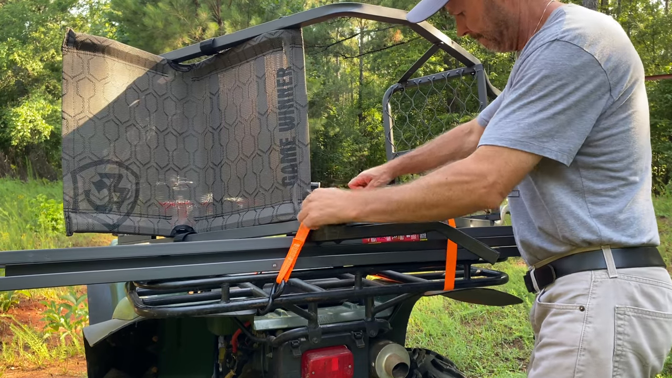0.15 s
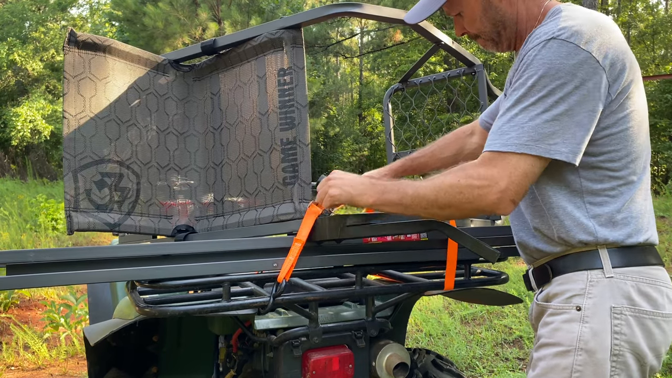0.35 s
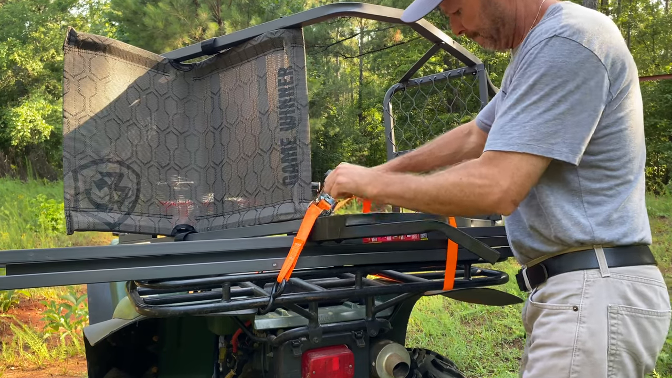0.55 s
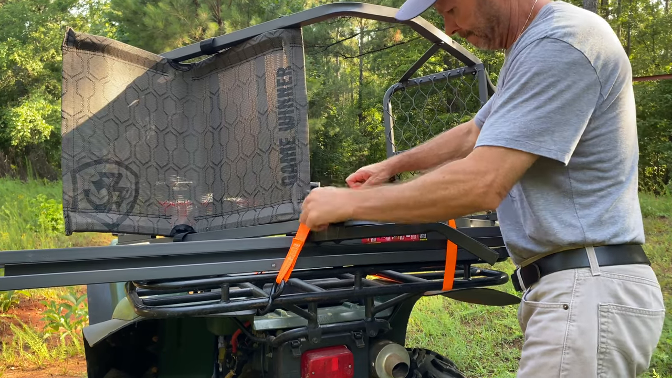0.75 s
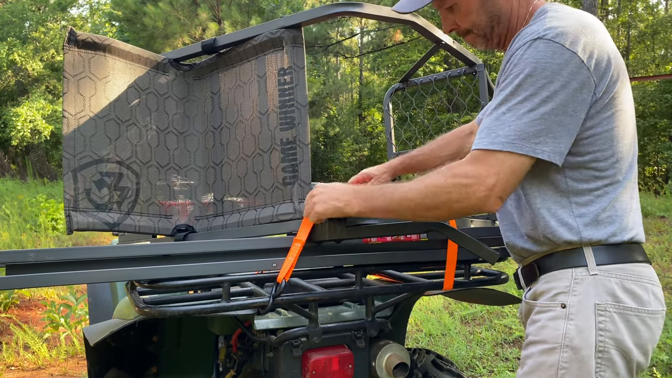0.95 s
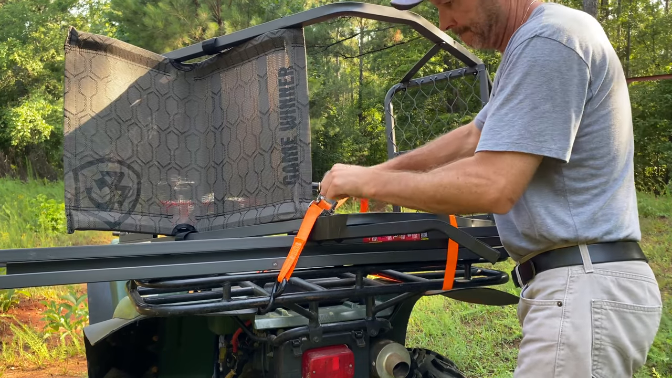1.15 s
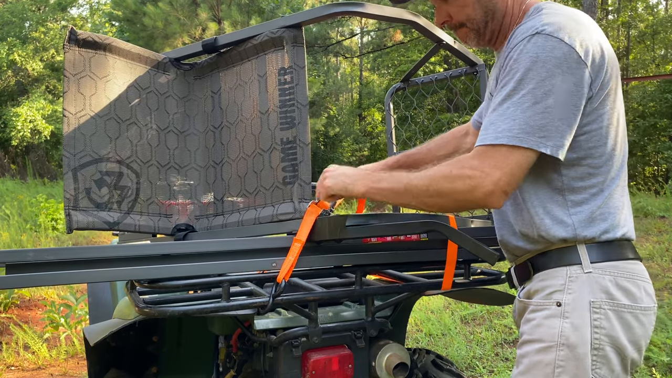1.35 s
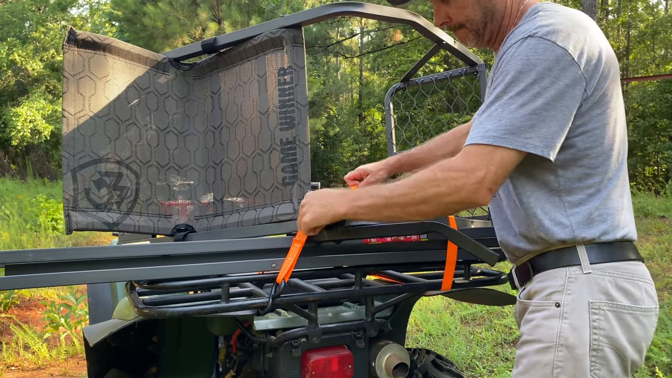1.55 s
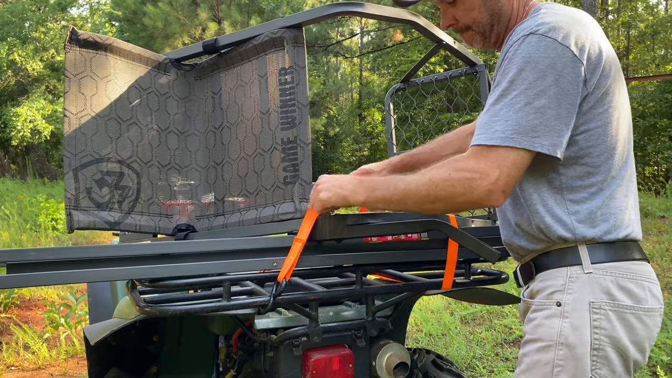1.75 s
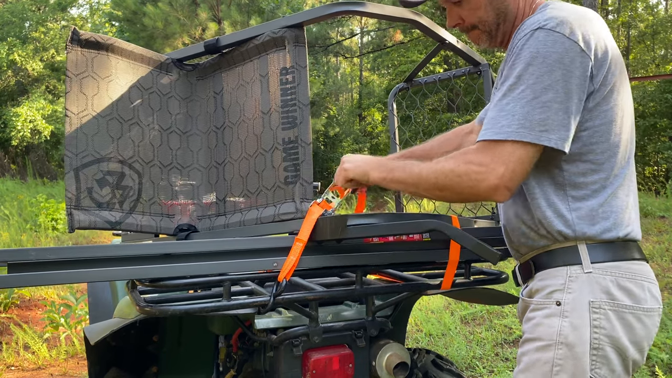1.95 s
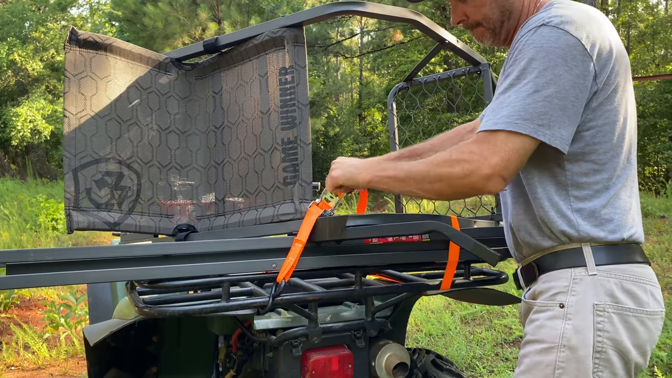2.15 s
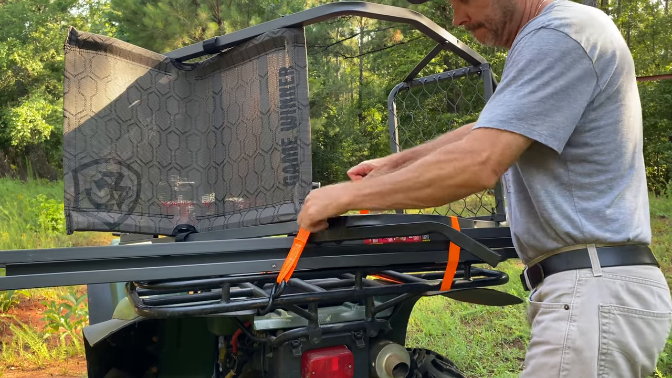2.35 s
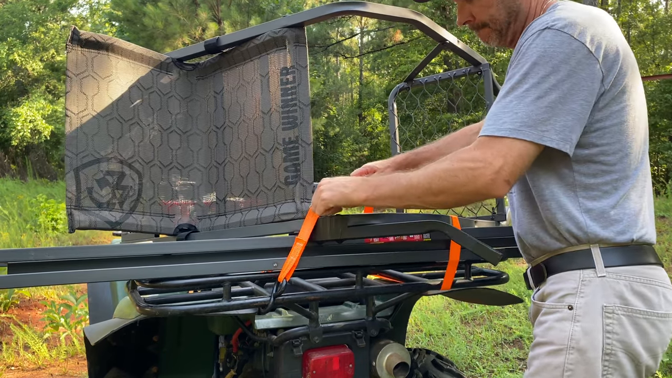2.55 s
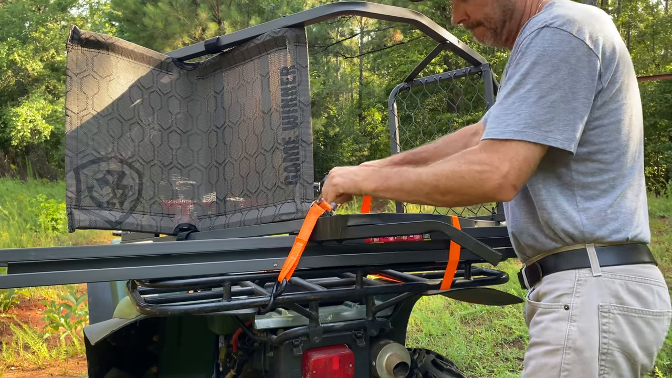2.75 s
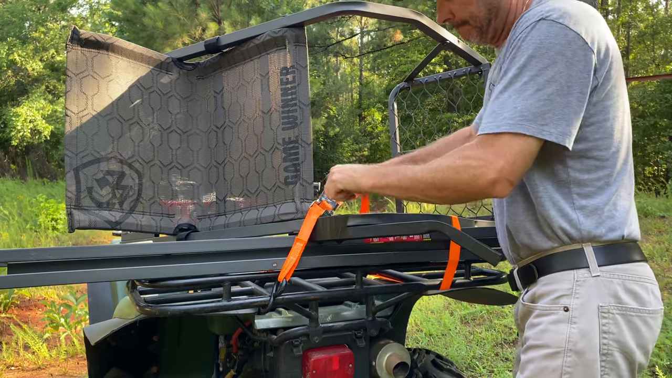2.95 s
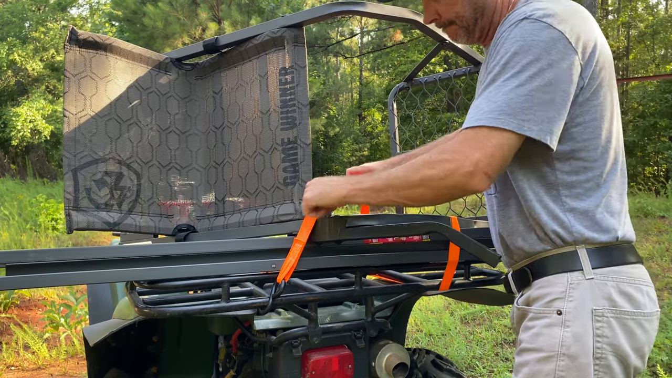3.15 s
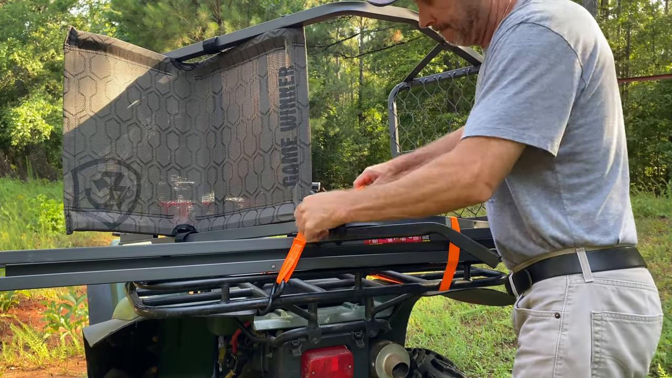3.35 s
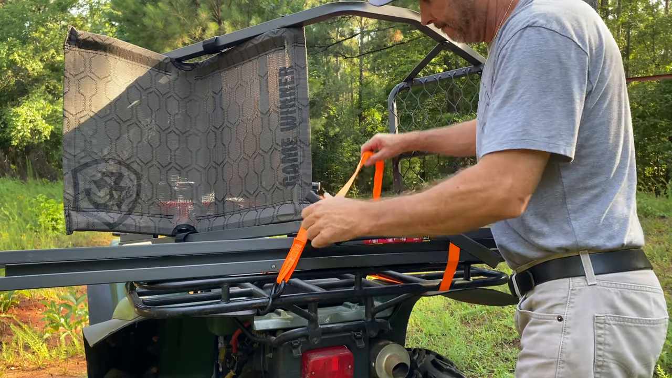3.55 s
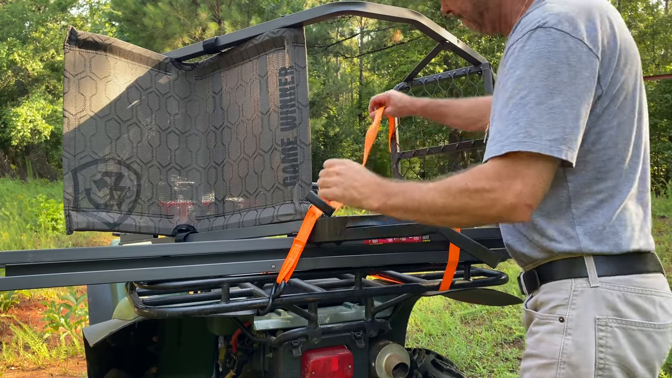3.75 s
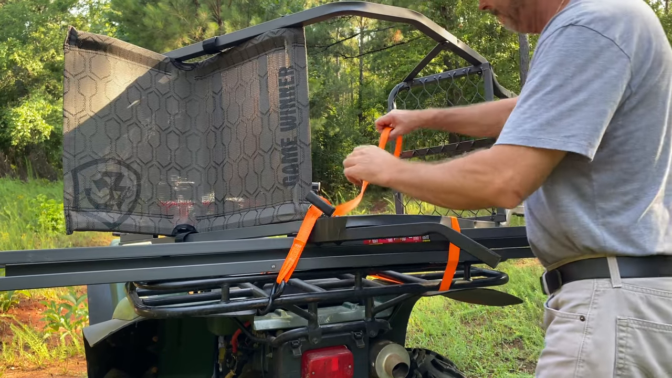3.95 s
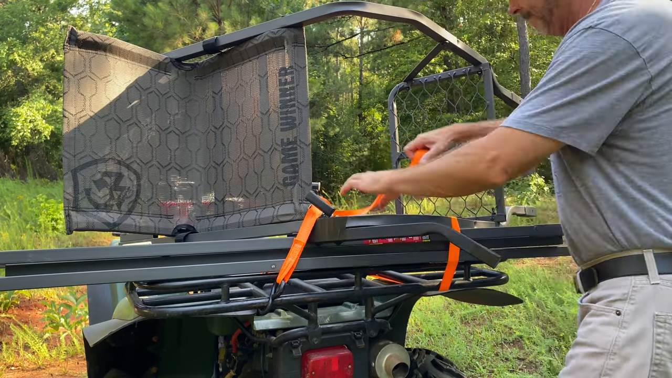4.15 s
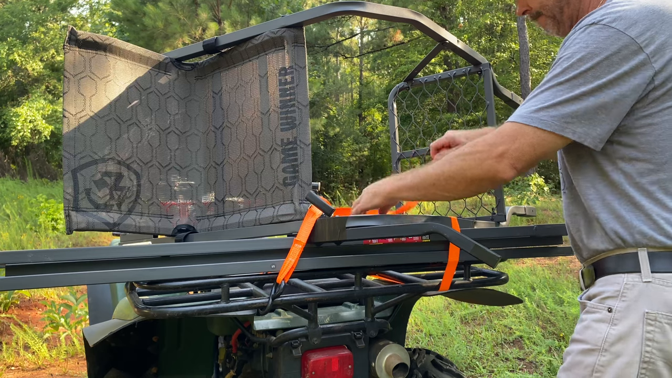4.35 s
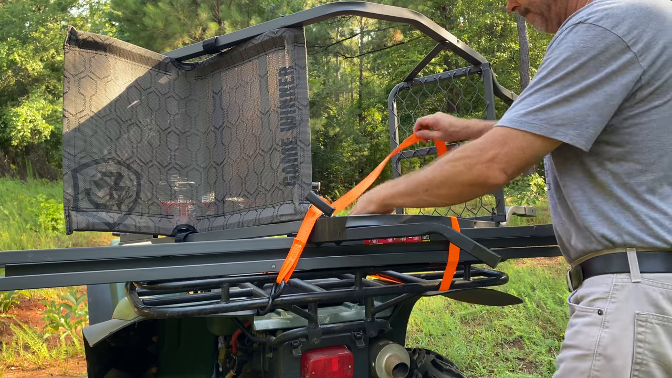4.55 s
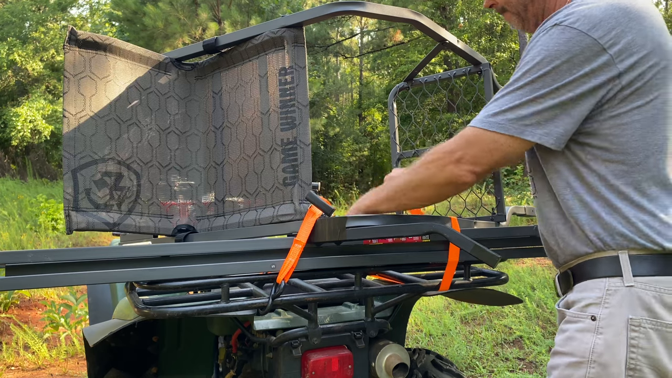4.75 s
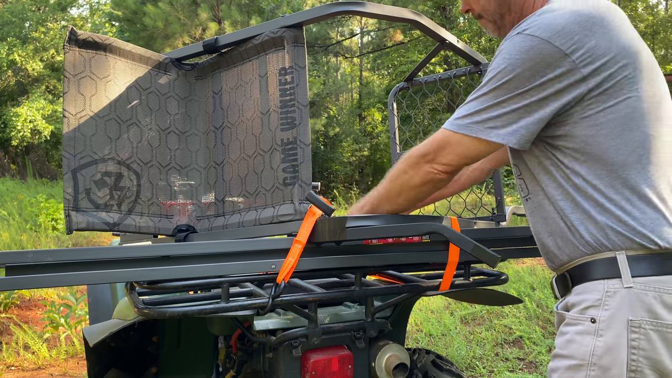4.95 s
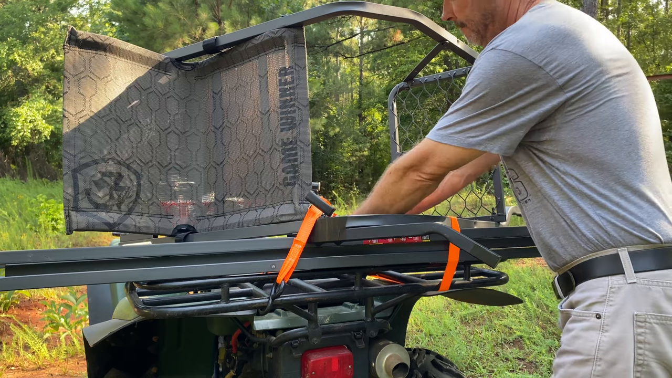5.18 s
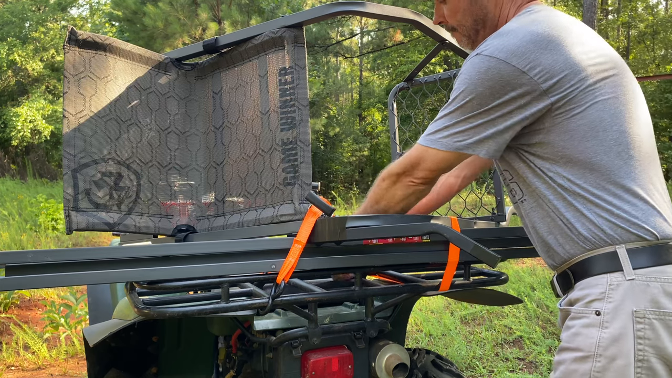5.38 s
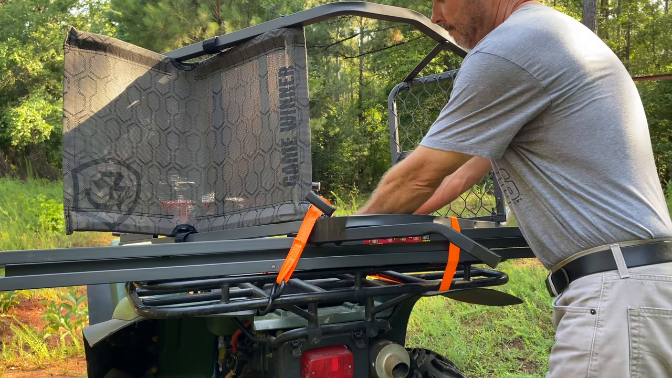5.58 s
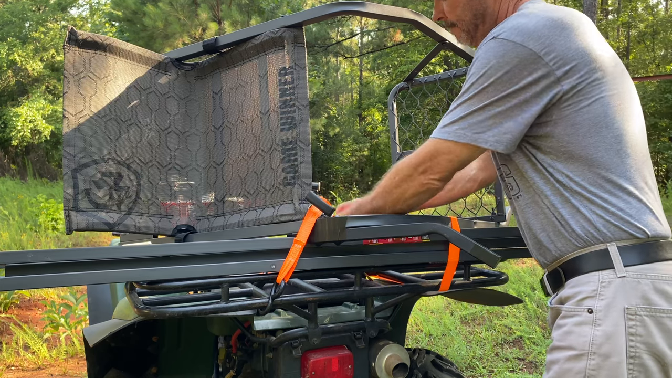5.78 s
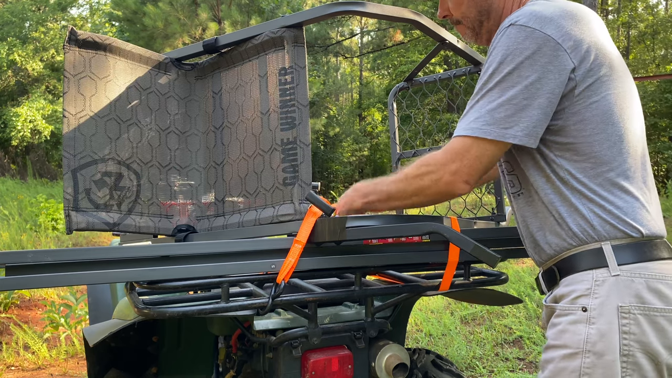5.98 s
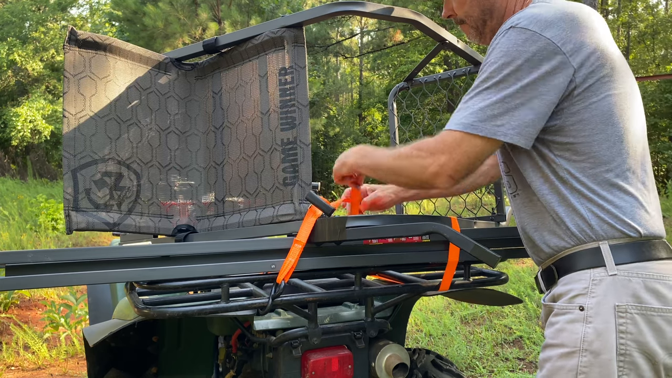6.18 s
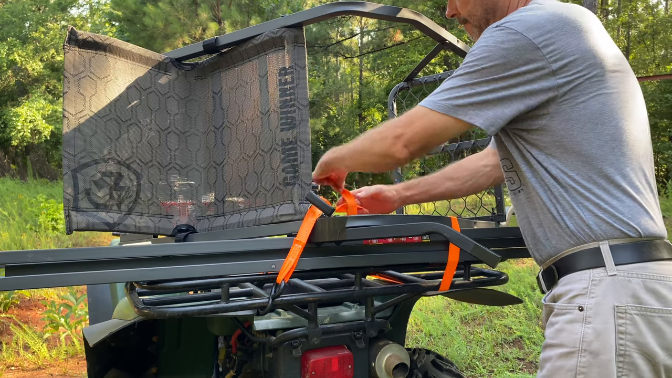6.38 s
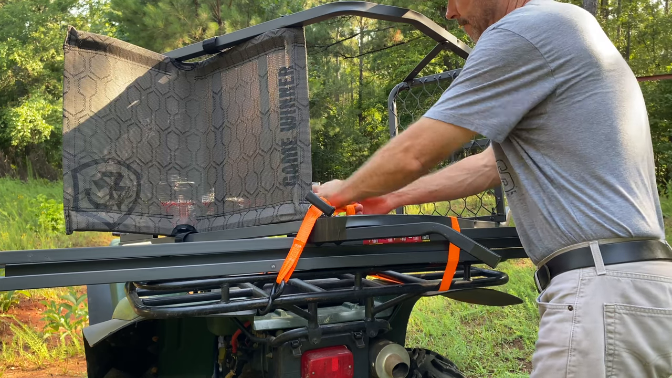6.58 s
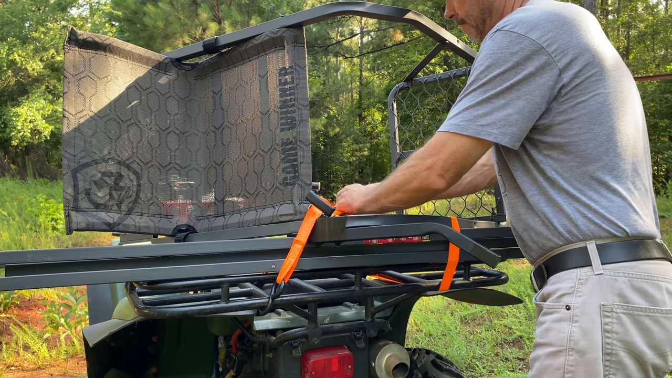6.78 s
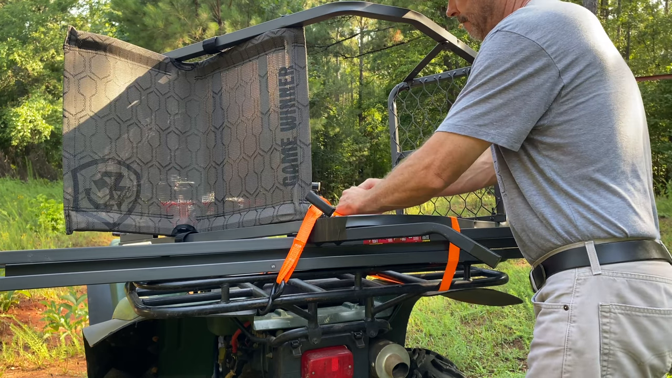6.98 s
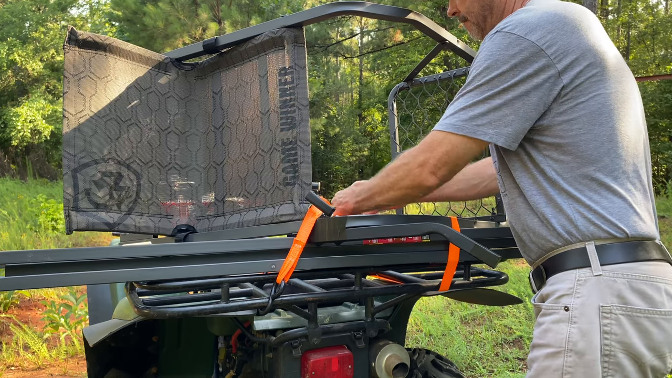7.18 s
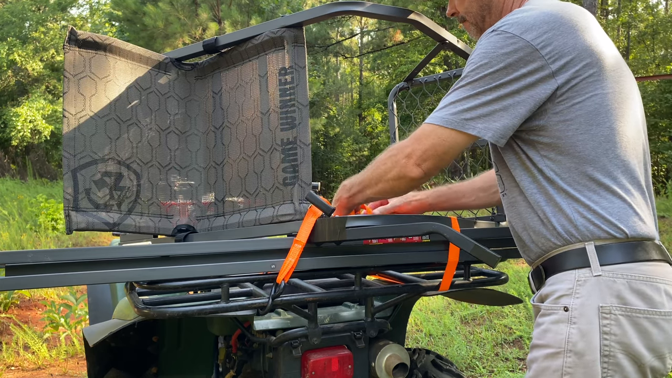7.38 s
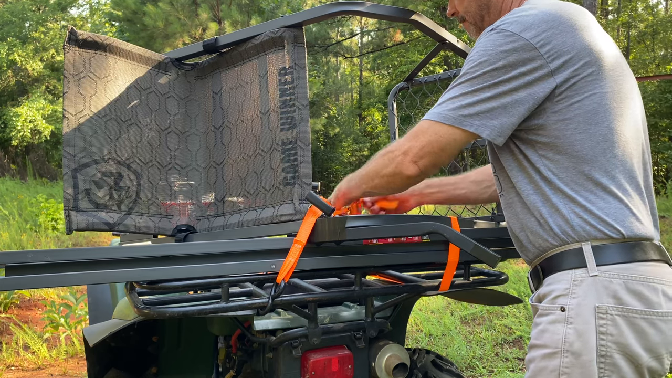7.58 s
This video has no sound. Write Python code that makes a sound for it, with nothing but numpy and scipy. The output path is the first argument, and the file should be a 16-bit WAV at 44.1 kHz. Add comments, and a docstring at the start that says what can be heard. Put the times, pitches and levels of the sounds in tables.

```python
"""At the edge of a wood, a ratchet strap is cranked tight over a metal stand on a vehicle rack.
The pawl scrapes and snaps in shaped noise, clicks and ringing steel; damped modes knock in the rack.
The webbing is made of many tiny slips, its loose end gathered with a soft rustle; a few dull bumps follow.
Birds whistle in gliding sines with wooded echoes, insects drone in filtered noise, the air rumbles faintly."""
import sys
import numpy as np
from scipy import signal
from scipy.fft import rfft, irfft, next_fast_len
from scipy.io import wavfile

SR = 44100
rng = np.random.default_rng(int(sys.argv[2]) if len(sys.argv) > 2 else 0)


def generate_wav(signal):
    """Clip the signal to [-1, 1] and save it as 16-bit WAV at the path in sys.argv[1]."""
    frames = np.transpose(np.atleast_2d(signal))
    scaled = np.clip(frames, -1, 1) * 32767
    pcm = np.round(scaled).astype(np.int16)
    wavfile.write(sys.argv[1], SR, pcm)


N = 336041
TIME = np.arange(N) / SR

# Levels in the tables are relative: layer gains come on top.
# the pawl snaps home: (time [s], level [dB], crack over ring [dB], top sheen [dB],
# low note [Hz], middle note [Hz], high note [Hz], level of the notes [dB])
PAWL_SNAPS = [(0.403, -14.5, 9.5, -8, 1520, 5150, 5517, -1.5), (0.762, -11, 7, 4, 3210, 5264, 6350, 1),
              (1.1554, -12.5, 8.5, 6, 2310, 5470, 10460, 1), (1.4844, -10.5, 5, 5.5, 3208, 5150, 11089, 0),
              (1.8735, -9.5, 1, 12, 5330, 10244, 12069, 6),
              (1.955, -13.5, 4.5, 13.5, 4688, 5450, 9900, 4.5), (2.2365, -10, 8, 5, 3230, 5900, 8700, 5.5),
              (2.287, -10, 1, 12, 3240, 7170, 9300, -9), (2.801, -20.5, 3, 11, 1930, 3210, 5600, 7.5),
              (3.189, -10.5, 7, 3.5, 3840, 7175, 11640, 6.5)]
# the pawl drags softly up a tooth: (time [s], level [dB], rise [ms], low-mid body [dB], top sheen [dB])
PAWL_DRAGS = [(0.002, -35, 2.9, -9, -9), (0.333, -33.5, 11, 13, -2), (1.102, -30, 9.3, 2, -1)]
# the pawl clicks over a tooth: (time [s], level [dB], rise [ms], low-mid body [dB], top sheen [dB])
PAWL_TICKS = [(0.0236, -24, 3.5, 13, 9.5), (0.3447, -32, 1.3, -13, 2), (0.3532, -23, 2.5, -8, 8),
              (0.3818, -17.5, 1.54, 1.5, -10), (0.653, -20, 2.1, -11, 3), (1.115, -22, 0.95, -10, 2.5),
              (1.139, -20, 2.6, 8.5, 7), (1.361, -23, 2.1, -19, 0), (1.61, -33, 1.4, -21, 4),
              (1.8436, -23, 2, 2, 8.5), (1.8614, -19.5, 2.7, 1, 12), (1.931, -18.5, 1.9, -14, -4),
              (1.943, -17.5, 1.1, 7.5, 5), (2.7564, -27, 0.67, -22, 13), (2.783, -20, 1.6, -11, 11),
              (2.7992, -20, 0.9, 11.5, 4), (3.174, -34.5, 0.56, 15, -9)]
# modes of the ratchet's steel: (frequency [Hz], level [dB], t60 [s])
STEEL_MODES = [(1110, -15, .12), (1491, -11, .14), (1920, -13, .12), (2293, -15, .1), (2605, -16, .07),
               (3250, -7, .08), (3780, -6, .07), (4511, -9, .16), (5000, -7, .1), (5250, -9, .12),
               (5525, -8, .11), (5720, -7, .1), (6078, -9, .09), (6196, -7, .15), (6560, -3, .1),
               (6586, -2, .11), (6934, -9, .12), (7025, -8, .12), (7176, -7, .09), (10200, -9, .07),
               (10610, -12, .07), (11030, -8, .06), (14170, -15, .06)]
# colour of the cracks: (frequency [Hz], density [dB])
CRACK_COLOUR = [(400, -33), (1500, -39), (3000, -10), (3700, 4), (4500, -8), (5900, 17.5), (7200, -3),
                (9200, 6), (10500, -2), (11800, 6.5), (13200, -6), (15200, 2), (16000, -30)]
# colour of the chattering ring: (frequency [Hz], density [dB])
RING_COLOUR = [(200, -11), (400, -12), (600, -14.5), (1300, -4), (2200, -5), (3500, 2), (4400, 0),
               (6200, 6.5), (7600, 0.5), (9200, -0.5), (10400, -2.5), (11900, -4), (13200, -8),
               (15000, -10)]
# colour of the scattered tail: (frequency [Hz], density [dB])
TAIL_COLOUR = [(200, -4), (400, -1), (1500, -2), (3500, 1), (6500, -0.5), (9000, -12), (11500, -7),
               (13000, -18), (16000, -24)]
# the sharper the crack, the less low-mid body a snap has: [dB] with no crack to spare, [dB] lost per dB
BODY_DB, BODY_PER_CRACK = 8, 0.45

# modes of the rack and stand tubes: (frequency [Hz], level [dB], t60 [s])
RACK_MODES = [(123.5, -7.5, 0.65), (159.8, -11.5, 0.36), (337.7, -2.5, 0.12), (375, -5.5, 0.13),
              (398, -6, 0.2), (442.5, -4, 0.1), (590, -13, 0.024), (720, -2.5, 0.023), (948, -17, 0.18)]
# the stand shifts on the rack: (time [s], level [dB])
STAND_SHIFTS = [(0.029, -46), (0.889, -53), (1.254, -50.5), (2.42, -46)]
SHIFT_TILT_DB = -1  # per octave
# the strap grows taut over this time; snaps and ticks then jolt the rack harder, deeper and later
TIGHTEN_S = 3.02
SLACK_KNOCK_DB, TAUT_KNOCK_DB = -34.5, -26  # relative to the contact
SLACK_TILT_DB, TAUT_TILT_DB = 5, 1  # per octave
SLACK_DELAY_S, TAUT_DELAY_S = 0.00249, 0.01111

# rustle of the strap while the handle is worked: (time [s], level [dB])
STRAIN_RUSTLE = [(0.0, -58.5), (0.61, -70.5), (1.4, -59), (1.64, -58.5), (1.89, -85), (2.09, -61.5),
                 (2.7, -68), (3.03, -65), (3.4, -85)]
STRAIN_LIFT_DB = 2.5
# the loose end is gathered up with a soft rustle; the length is the spread of its bell-shaped swell
GATHER_S, GATHER_LENGTH_S, GATHER_DB = 4.75, 0.61, -70.5
# webbing slips or is brushed by a hand:
# (time [s], level [dB], spread of the swell [s], centre [Hz], band edge over centre [ratio])
STRAP_RUBS = [(0.008, -43.5, 0.04, 1500, 5.1), (0.894, -59, 0.024, 1280, 2),
              (1.258, -55.5, 0.015, 740, 1.16), (1.924, -35, 0.0084, 780, 1.44),
              (2.197, -54.5, 0.056, 756, 8.7), (2.425, -57.5, 0.057, 930, 8.9),
              (2.892, -53, 0.034, 630, 1.8), (2.954, -52.5, 0.051, 417, 1.34),
              (3.16, -55.5, 0.042, 1430, 2.2), (5.845, -67, 0.05, 1100, 3.7)]
# colour of the woven fibres: (frequency [Hz], density [dB])
FIBRE_COLOUR = [(150, 6.5), (380, 10), (800, -19), (1600, -3.5), (3000, -3), (7000, -5.5), (14000, -24)]
# slack webbing pats the stand: (time [s], level [dB])
WEBBING_PATS = [(0.17, -65), (0.868, -52.5), (2.108, -62), (2.41, -58), (2.964, -56), (3.049, -60.5),
                (3.113, -63), (3.936, -57), (4.318, -67), (4.943, -53), (6.585, -68)]
# dull bumps: (time [s], level [dB])
DULL_BUMPS = [(5.752, -35.5), (5.819, -21), (5.868, -38.5)]

# near bird notes slur from one pitch to another:
# (time [s], length [s], start pitch [Hz], end pitch [Hz], level [dB], place of the peak [share of length])
NEAR_NOTES = [(.052, .048, 3100, 2550, -39.5, 1), (.095, 0.04, 2500, 3080, -45, 0.8),
              (.122, 0.09, 3086, 2795, -44.5, 0.28), (.325, 0.068, 2570, 2653, -39.5, 0.43),
              (.372, 0.066, 2840, 2540, -43.5, 0.15), (.675, 0.08, 2390, 2360, -53, 0.83),
              (.78, 0.14, 2880, 2920, -55.5, 0.5), (1.166, 0.055, 3540, 3494, -32.5, 0.32),
              (1.3, 0.081, 2060, 2690, -47, 0.75), (1.368, 0.047, 3090, 2420, -41.5, 0.84),
              (1.41, 0.072, 2460, 2100, -47, .2), (2.12, 0.12, 8230, 7970, -49, 0.39),
              (2.192, 0.058, 2770, 2380, -38.5, 0.39), (2.405, 0.16, 2086, 3040, -47.5, 0.58),
              (2.56, 0.055, 3100, 2510, -41, 0.78), (2.615, 0.037, 2496, 2550, -39, 0.21),
              (2.655, 0.05, 3150, 2990, -53, .4)]
# a high, fluttering phrase that rises and tumbles down:
# (time [s], length [s], start pitch [Hz], end pitch [Hz], level [dB], place of the peak [share of length])
HIGH_PHRASE = [(1.645, 0.043, 5380, 5900, -48, 0.56), (1.652, .022, 8200, 8100, -52, .5),
               (1.712, 0.036, 5840, 4800, -42.5, 0.79), (1.745, 0.04, 4750, 4200, -40, .35),
               (1.792, 0.02, 4250, 4520, -45, .6), (1.815, 0.03, 4470, 3170, -40, 0.19)]
# far off, one bird repeats a falling chip: (time [s], level [dB])
FAR_CHIPS = [(3.755, -54.5), (6.386, -54), (7.562, -55)]
CHIP_S, CHIP_FROM_HZ, CHIP_TO_HZ, CHIP_PEAK_SHARE = 0.041, 3170, 2750, 0.14
# other far birds sing long notes and faint slurs:
# (time [s], length [s], start pitch [Hz], end pitch [Hz], level [dB], place of the peak [share of length])
FAR_HELD_NOTES = [(4.676, 0.32, 2617, 2646, -65.5, 0.57), (4.804, 0.27, 1740, 1975, -72, 0.68),
                  (4.952, 0.12, 2390, 2250, -64, .2), (4.969, 0.066, 2955, 3250, -55.5, 0.65),
                  (5.03, 0.26, 3225, 3240, -59.5, 0.087), (6.2, 0.19, 2700, 3080, -70, 0.84),
                  (7.102, 0.16, 2750, 3070, -69, 0.7), (7.422, 0.14, 2556, 3190, -66, 0.98)]
NOTE_END_DB, NOTE_EDGE_S = -9, 0.005  # a note swells to its peak and sinks again
ECHO_S, ECHO_DB = 0.118, -24  # the edge of the wood throws near notes back

# colour of the insect chorus: (frequency [Hz], density [dB])
CHORUS_COLOUR = [(880, -48.5), (1500, -29.5), (2390, -17), (2970, -8.5), (4240, -1.5), (4780, 2),
                 (5490, -1.5), (7030, -4), (8240, -10.5), (9470, -9.5), (12000, -31.5), (12800, -32),
                 (16000, -48)]
# the chorus eases a little and then stays level
CHORUS_DB, CHORUS_EASE_DB, CHORUS_EASE_S = -54, 1.1, 2.5
# single singers: (frequency [Hz], width [Hz], start level [dB], end level [dB],
# pulse rate [1/s], pulse depth [0-1])
INSECT_SINGERS = [(4768, 260, -64, -61, 53, 0.3), (6790, 27, -96, -65.5, 34, 0.3)]
# colour of the air rumble: (frequency [Hz], density [dB])
AIR_COLOUR = [(12, -77), (20, -29), (46, -5.5), (65, 1.5), (76, -4), (92, -6), (183, -10), (275, -17),
              (309, -24), (445, -30.5), (561, -36.5), (1080, -41.5), (2000, -48), (2600, -82), (4400, -120)]
AIR_DB = -54.5

# how far the left side leads the right: (frequency [Hz], phase [rad])
SIDE_PHASE = [(0, 0), (950, -0.0), (1460, 0.7), (3790, 0.5), (5770, 1.7), (7150, 0.1), (8350, -2.3),
              (9560, -3.5), (10400, -6.0), (11600, -6.4), (12700, -9.2), (13900, -9.7), (14600, -12.2),
              (16500, -12.8)]
CUTOFF_HZ = 15900


def from_db(db):
    """Decibels to gain."""
    return 10 ** (np.asarray(db) / 20)


def rms_one(x):
    """Scale to unit rms."""
    return x / np.sqrt(np.mean(x ** 2) + 1e-20)


def add(track, s, sound):
    """Mix a sound into a track from time s on."""
    start = max(round(s * SR), 0)
    track[..., start:start + sound.shape[-1]] += sound[..., :N - start]


def colour(x, spectrum):
    """Shape by a smooth spectrum; white noise keeps its power."""
    size = next_fast_len(N + 4096)
    hz, db = np.transpose(spectrum)
    bins = np.maximum(np.fft.rfftfreq(size, 1 / SR), 1)
    gain = from_db(np.interp(np.log(bins), np.log(hz), db))
    return irfft(rfft(x, size) * rms_one(gain), size)[..., :N]


def butter(x, hz, kind):
    """Recursive Butterworth filter of order two."""
    return signal.sosfilt(signal.butter(2, hz, kind, fs=SR, output="sos"), x)


def gentle(x, hz, kind):
    """First-order recursive filter."""
    return signal.lfilter(*signal.butter(1, hz, kind, fs=SR), x)


def drift(rate):
    """Random wander: straight lines between normal random values, `rate` of them per second."""
    knots = rng.standard_normal(12000)
    return np.interp(TIME * rate, np.arange(len(knots)), knots)


def ring(x, hz, t60):
    """A two-pole resonator: a unit click sets a decaying sine of height 1 ringing."""
    radius, w = from_db(-60 / (t60 * SR)), 2 * np.pi * hz / SR
    return signal.lfilter([0, np.sin(w)], [1, -2 * radius * np.cos(w), radius * radius], x + 1e-18)


def fade(t, t60):
    """Exponential decay, 60 dB down after t60 seconds."""
    return np.exp(-np.log(1000) * t / t60)


def bell(t, centre, spread):
    """A swell shaped like a bell."""
    return np.exp(-.5 * ((t - centre) / spread) ** 2)


def stereo_noise(alike, size=N):
    """Two white noises with a given correlation."""
    mid, side = rng.standard_normal((2, size))
    return (np.sqrt(1 + alike) * mid + np.sqrt(1 - alike) * side * [[1], [-1]]) / np.sqrt(2)


def pan(x, left_db):
    """Level difference between the sides."""
    return x * from_db([[left_db / 2], [-left_db / 2]])


def struck(blows, modes, spread_db, tilts):
    """Every blow excites every mode with a strength of its own; a tilt favours the high or the low ones."""
    at = [round(row[0] * SR) for row in blows]
    blow_db = np.array([[row[1]] for row in blows])
    strength_db = blow_db + spread_db * rng.standard_normal((len(blows), len(modes)))
    middle_hz = np.median([mode[0] for mode in modes])
    out = np.zeros(N)
    for k, (hz, db, t60) in enumerate(modes):
        clicks = np.zeros(N)
        tilt_db = tilts * np.log2(hz / middle_hz)
        clicks[at] = from_db(strength_db[:, k] + db + tilt_db) * (-1) ** k
        out += ring(clicks, hz, t60)
    return out


def pawl_scrapes():
    """Everything the pawl does between snaps: clicks over the teeth and soft drags up them."""
    return PAWL_TICKS + PAWL_DRAGS


def ratchet(ring_t60=0.068, tail_t60=0.22, crack_t60=0.0058, same=0.3, snap_db=-14.5, scrape_db=-9,
            tail_db=-12.5, chatter_db=3.5, tooth_crack_db=-8, rebound_db=-10, rebound_s=0.003,
            impact_db=15, grit_db=3):
    """Each contact cracks, chatters in small steel parts, scatters off the vehicle and rebounds."""
    t = np.arange(SR // 3) / SR
    cracks, rings, tails = np.zeros((3, 2, N))
    parts = stereo_noise(0.81, size=len(t))  # shared by every contact

    def contact(body_db, sheen_db):
        """The point of contact changes the fine ring and its balance of lows and highs; the highs die first."""
        grain = np.sqrt(same) * parts + np.sqrt(1 - same) * stereo_noise(0.36, size=len(t))
        low, high = gentle(grain, 2000, "low"), gentle(grain, 9000, "high")
        return grain + (from_db(body_db) - 1) * low + (from_db(sheen_db) * fade(t, 0.098) - 1) * high

    def scatter():
        """Reflections build up over some milliseconds and differ between the sides."""
        build_up = 1 - fade(t, 0.03)
        return from_db(tail_db) * stereo_noise(0.41, size=len(t)) * fade(t, tail_t60) * build_up

    def click():
        """Steel meets steel in one hard impact with a little grit behind it."""
        grit = rng.standard_normal(len(t)) * fade(t, crack_t60) * (1 - fade(t, 0.00066))
        return from_db(impact_db) * (t == 0) + from_db(grit_db) * grit

    def rebounds(s, gain):
        """A few tiny clicks of uneven spacing and strength."""
        for delay in np.cumsum(rebound_s * rng.uniform(.3, 1.7, size=5)):
            strength = from_db(rebound_db + rng.normal(0, 1.1)) * fade(delay, ring_t60)
            add(rings, s + delay, gain * strength * click() * 2)

    slide_s = 0.0056  # the pawl slips off the tip of the tooth just before it lands
    for s, db, crack_db, sheen_db, *_ in PAWL_SNAPS:
        body_db = BODY_DB - BODY_PER_CRACK * crack_db
        gain = from_db(db + snap_db)
        slide = contact(body_db, sheen_db) * (t / slide_s) ** 2 * (t < slide_s)
        add(rings, s - slide_s, gain * from_db(-8.5) * slide)
        add(cracks, s + 0.00042, gain * from_db(crack_db) * click())
        add(rings, s, gain * contact(body_db, sheen_db) * fade(t, ring_t60) * (1 - fade(t, 0.0046)))
        add(tails, s, gain * scatter())
        rebounds(s, gain)

    scrapes = pawl_scrapes()
    for s, db, rise_ms, body_db, sheen_db in scrapes:
        gain = from_db(db + scrape_db)
        rise = 1 - np.exp(-1000 * t / rise_ms)
        grain = contact(body_db, sheen_db)
        tooth_crack = from_db(tooth_crack_db) * grain[0] * fade(t, 3 * crack_t60)
        add(cracks, s + rise_ms / 1000, gain * tooth_crack)
        add(rings, s, gain * grain * rise * fade(t, 0.083))
        add(tails, s, gain * scatter())
        rebounds(s, gain)

    rings = rings * rms_one(from_db(chatter_db * drift(1100)))  # loose parts rebound about once a millisecond
    snap_steel = from_db(-26.5) * struck(PAWL_SNAPS, STEEL_MODES, spread_db=4, tilts=0)
    scrape_steel = from_db(-23.5) * struck(scrapes, STEEL_MODES, spread_db=3.5, tilts=0)
    noises = colour(cracks, CRACK_COLOUR) + colour(rings, RING_COLOUR) + colour(tails, TAIL_COLOUR)
    return noises + snap_steel + scrape_steel + pawl_notes()


def pawl_notes(t60=0.052, note_db=-23, high_tilt_db=-1):
    """The pawl and handle ring with three short notes that depend on where they meet."""
    out, t = np.zeros(N), np.arange(SR // 8) / SR
    for s, db, _, _, *pitches, ring_db in PAWL_SNAPS:
        for hz in pitches:
            level_db = db + ring_db + note_db + high_tilt_db * np.log2(hz / pitches[1])
            add(out, s, from_db(level_db) * np.sin(2 * np.pi * hz * t) * fade(t, t60))
    return out


def rack_knocks():
    """The strap passes snaps and ticks on as far as it is taut: (time [s], level [dB], tilt [dB/octave])."""
    s, db = np.transpose([row[:2] for row in PAWL_SNAPS + PAWL_TICKS])
    delay_s = np.interp(s, [0, TIGHTEN_S], [SLACK_DELAY_S, TAUT_DELAY_S])
    gain_db = np.interp(s, [0, TIGHTEN_S], [SLACK_KNOCK_DB, TAUT_KNOCK_DB])
    tilt_db = np.interp(s, [0, TIGHTEN_S], [SLACK_TILT_DB, TAUT_TILT_DB])
    shifts = [(at, level, SHIFT_TILT_DB) for at, level in STAND_SHIFTS]
    return np.array([*zip(s + delay_s, db + gain_db, tilt_db)] + shifts)


def rack():
    """Jolts through the strap and shifts of the stand ring the damped modes of the tubes."""
    knocks = rack_knocks()
    tubes = struck(knocks, RACK_MODES, spread_db=3.5, tilts=knocks[:, 2])
    return from_db(1.5) * butter(tubes, 880, "low")


def rustle_db():
    """Level of the webbing: strained while cranking, then loosely gathered."""
    strained = from_db(np.interp(TIME, *np.transpose(STRAIN_RUSTLE)) + STRAIN_LIFT_DB)
    gathered = from_db(GATHER_DB) * bell(TIME, GATHER_S, GATHER_LENGTH_S)
    return 20 * np.log10(np.hypot(strained, gathered))


def slipping(slips_per_s, stand_t60, uneven_db=4, count=6):
    """Random uneven slips at several places along the stand, each place with a ring of its own; rms 1."""
    t = np.arange(SR // 10) / SR
    happens = rng.random(N) < slips_per_s / SR
    slips = happens * rng.standard_normal(N) * from_db(uneven_db * rng.uniform(-1.1, 1, N))
    place = rng.integers(0, count, N)
    out = np.zeros((2, N))
    for k in range(count):
        response = stereo_noise(0.55, size=len(t)) * fade(t, stand_t60)
        out += signal.oaconvolve((slips * (place == k))[None], response, axes=1)[:, :N]
    return rms_one(out)


def webbing(slips_per_s=170, rub_slips_per_s=2500, stand_t60=0.048, fibre_db=-13):
    """Fibres catch and slip, each slip ringing briefly in the stand; under a hand they merge into a soft rub."""
    fibres = colour(slipping(slips_per_s, stand_t60), FIBRE_COLOUR)
    rubbing = slipping(rub_slips_per_s, stand_t60)
    out = fibres * from_db(rustle_db() + drift(46))
    for s, db, spread, hz, width in STRAP_RUBS:
        near = np.abs(TIME - s) < 4 * spread
        swell = from_db(db) * bell(TIME[near], s, spread)
        rub = rms_one(butter(rubbing[:, near], [hz / width, hz * width], "band"))
        out[:, near] += swell * (rub + from_db(fibre_db) * fibres[:, near])
    return out


def pats(swell_s=0.0097, low_hz=330, high_hz=2100):
    """Slack webbing lands on the stand in one soft, compact knock."""
    out, t = np.zeros((2, N)), np.arange(SR // 8) / SR
    for s, db in WEBBING_PATS:
        cloth = rms_one(butter(stereo_noise(0.35, size=len(t)), [low_hz, high_hz], "band"))
        add(out, s, from_db(db) * cloth * t / swell_s * np.exp(1 - t / swell_s))
    return out


def bumps(hz=70, swell_s=0.0094, skew=0.56):
    """A heavily damped low thud swells and dies within a few cycles, out of step on the two sides."""
    out, t = np.zeros((2, N)), np.arange(SR // 5) / SR
    shape = (t / swell_s * np.exp(1 - t / swell_s)) ** 1.43
    thud = -shape * np.sin(2 * np.pi * hz * t + skew * np.array([[1], [-1]]))  # skew in radians
    for s, db in DULL_BUMPS:
        add(out, s, from_db(db) * thud)
    return out


def whistle(notes, waver):
    """Nearly pure tones that ease from pitch to pitch, swell and sink."""
    out = np.zeros(N)
    for s, length, from_hz, to_hz, db, peak_share in notes:
        t = np.arange(0, length, 1 / SR)
        along = t / t[-1]
        glide = from_hz + (to_hz - from_hz) * np.sin(np.pi / 2 * along) ** 2
        pitch = glide * (1 + waver * drift(254)[:len(t)])
        swell_db = np.interp(along, [0, peak_share, 1], [NOTE_END_DB, 0, NOTE_END_DB])
        ends = np.clip(np.minimum(t, t[-1] - t) / NOTE_EDGE_S, 0, 1)
        tone = np.sin(2 * np.pi * np.cumsum(pitch) / SR)
        add(out, s, np.sqrt(2) * from_db(db + swell_db) * ends * tone)
    return out


def far_notes():
    """Chips and held notes from deep in the wood, as rows for whistle()."""
    chips = [(s, CHIP_S, CHIP_FROM_HZ, CHIP_TO_HZ, db, CHIP_PEAK_SHARE) for s, db in FAR_CHIPS]
    return chips + FAR_HELD_NOTES


def wood(x, t60):
    """Countless weak echoes from trunks and leaves."""
    t = np.arange(SR) / SR
    echoes = rng.standard_normal((2, SR)) * fade(t, t60) * (1 - fade(t, 0.014))
    return signal.fftconvolve(x[None], rms_one(echoes) / np.sqrt(SR), axes=1)[:, :N]


def birds(flutter_db=5, high_flutter_db=6.5):
    """Near notes are clear with one faint echo, high slurs blur in the leaves, far notes are mostly echoes."""
    near = whistle(NEAR_NOTES, waver=0.0086) * from_db(flutter_db * np.minimum(drift(90), 1))
    high = whistle(HIGH_PHRASE, waver=0.0214) * from_db(high_flutter_db * np.minimum(drift(160), 1))
    far = whistle(far_notes(), waver=0.014)
    near_blurred = from_db(-4.5) * near + from_db(-12) * wood(near, t60=.06)
    high_blurred = from_db(-7) * high + from_db(-6.5) * wood(high, t60=.06)
    echo = from_db(ECHO_DB) * np.interp(TIME - ECHO_S, TIME, near, left=0)
    long_tail = from_db(-17) * wood(near + high, t60=1.0)
    far_blurred = from_db(-3) * far + from_db(1.0) * wood(far, t60=0.57)
    return near_blurred + high_blurred + echo + long_tail + far_blurred


def insects():
    """A distant chorus blends into a hiss, with a few narrow pulsing voices standing out."""
    chorus_db = CHORUS_DB + CHORUS_EASE_DB * np.exp(-TIME / CHORUS_EASE_S)
    out = from_db(chorus_db + 0.043 * drift(27)) * colour(stereo_noise(0.24), CHORUS_COLOUR)
    for hz, width_hz, start_db, end_db, per_s, depth in INSECT_SINGERS:
        buzz = rms_one(butter(stereo_noise(0.84), [hz - width_hz / 2, hz + width_hz / 2], "band"))
        pulsing = 1 + depth * np.sin(2 * np.pi * per_s * TIME + drift(2))
        out += buzz * pulsing * from_db(np.linspace(start_db, end_db, N) + drift(26))
    return out


def air(settle_db=3.5):
    """Low outdoor rumble, alike on both sides in the bass only; its upper part slowly settles."""
    noise = butter(stereo_noise(0.83), 253, "low") + butter(stereo_noise(0), 400, "high")
    upper = gentle(noise, 180, "high")
    settling = from_db(settle_db * (1.3 - TIME / TIME[-1]))
    noise = noise + upper * (settling - 1)
    return from_db(AIR_DB + 2 * drift(6.5)) * colour(noise, AIR_COLOUR)


def off_axis(x):
    """Sound from one side reaches left and right out of step, by a phase that varies with frequency."""
    size = next_fast_len(N + 4096)
    phase = np.interp(np.fft.rfftfreq(size, 1 / SR), *np.transpose(SIDE_PHASE))
    left = irfft(rfft(x[0], size) * np.exp(1j * phase), size)[:N]
    return np.array([left, x[1]])


def scene():
    """Ratchet, rack and strap close by; the wood all around."""
    close = pan(off_axis(from_db(1.5) * ratchet()), left_db=1.5)
    close = close + pan(rack() + webbing() + pats(), left_db=2.5) + pan(bumps(), left_db=4)
    around = pan(off_axis(birds()), left_db=2.5) + pan(off_axis(insects()), left_db=3)
    return close + around + pan(air(), left_db=2)


def record(dry):
    """The top is cut steeply by an elliptic low-pass."""
    return signal.sosfilt(signal.ellip(10, .1, 80, CUTOFF_HZ, fs=SR, output="sos"), dry)


dry = scene()
out = record(dry)
generate_wav(out)
```